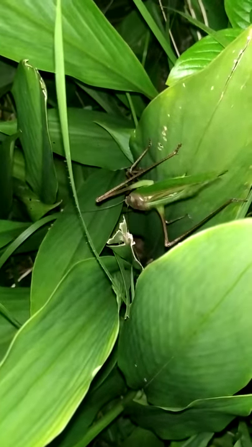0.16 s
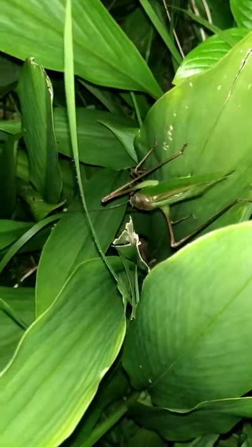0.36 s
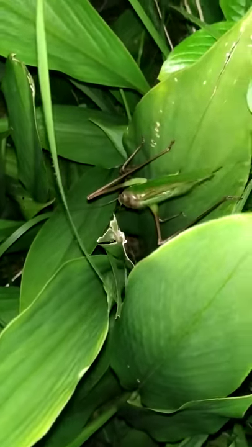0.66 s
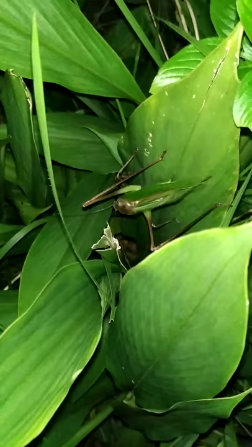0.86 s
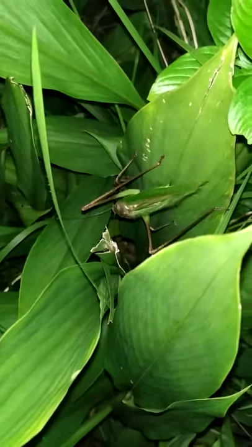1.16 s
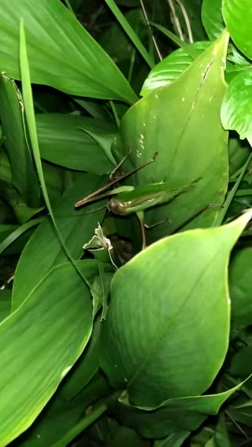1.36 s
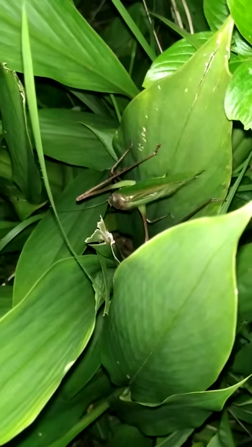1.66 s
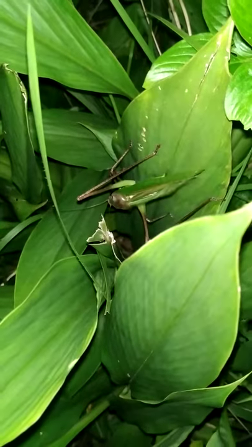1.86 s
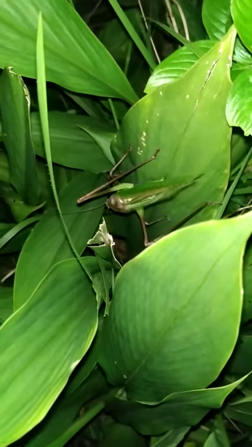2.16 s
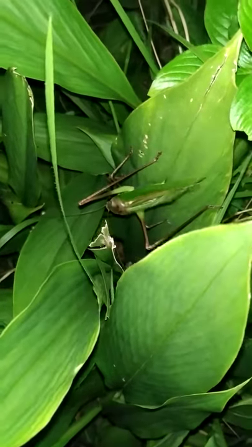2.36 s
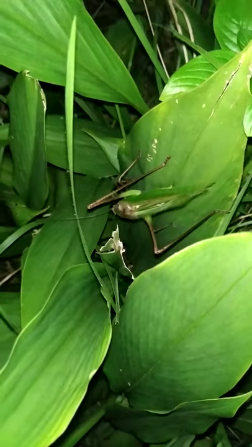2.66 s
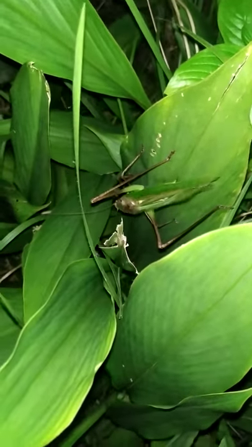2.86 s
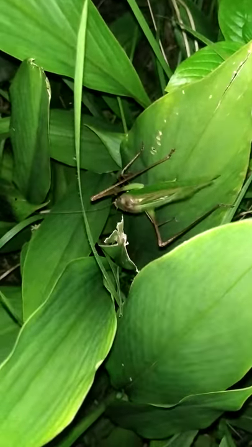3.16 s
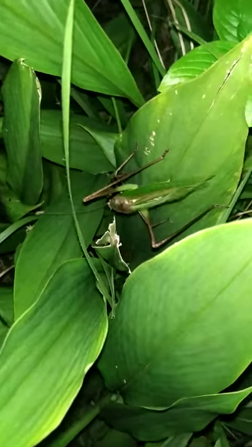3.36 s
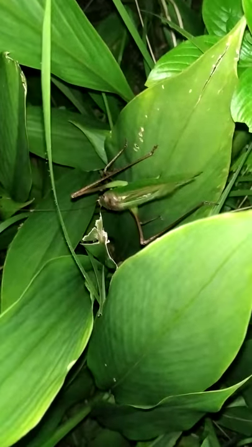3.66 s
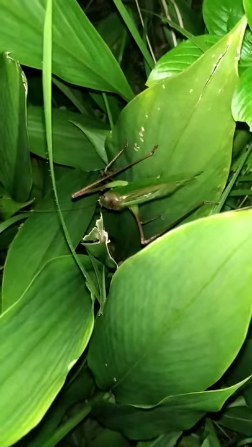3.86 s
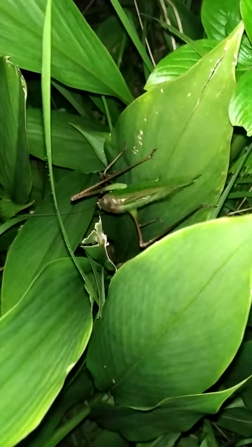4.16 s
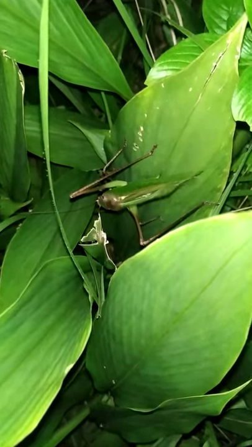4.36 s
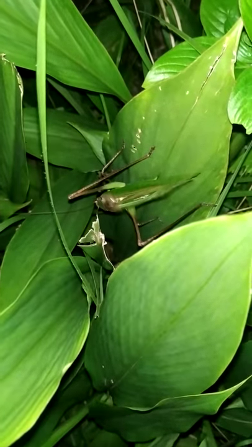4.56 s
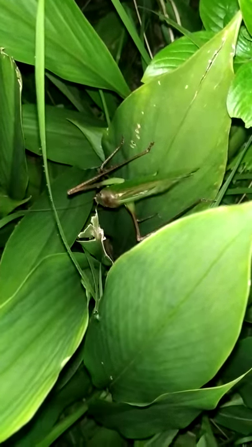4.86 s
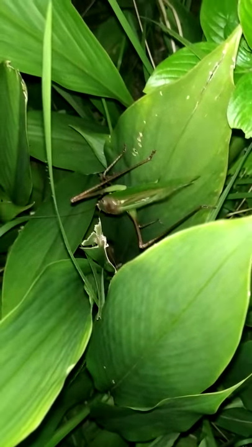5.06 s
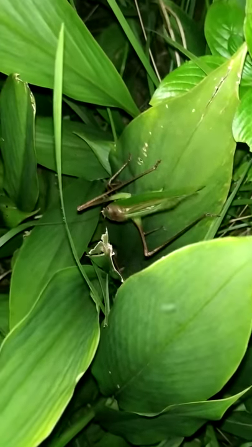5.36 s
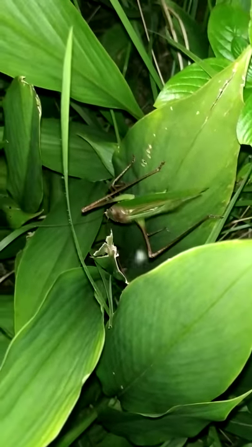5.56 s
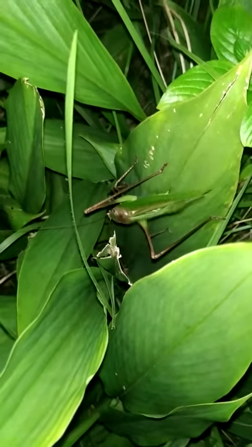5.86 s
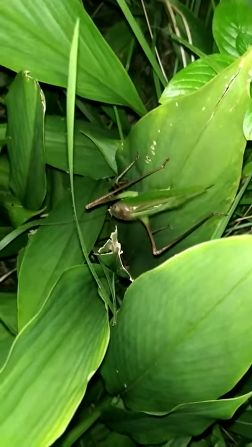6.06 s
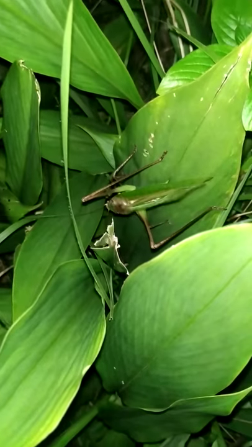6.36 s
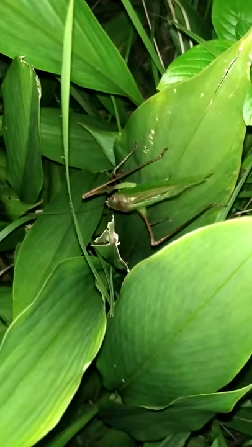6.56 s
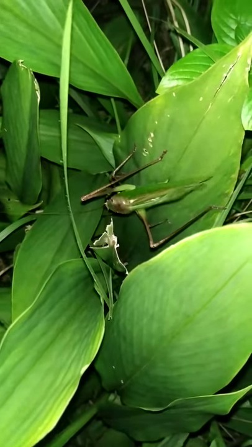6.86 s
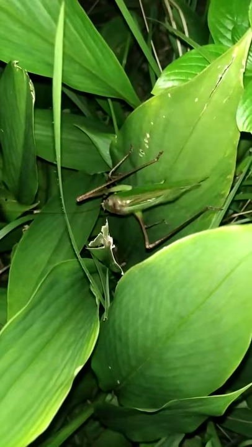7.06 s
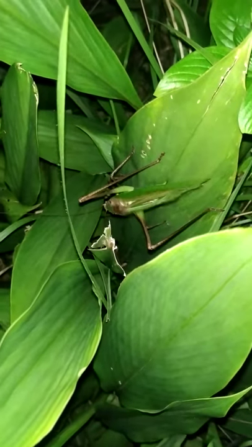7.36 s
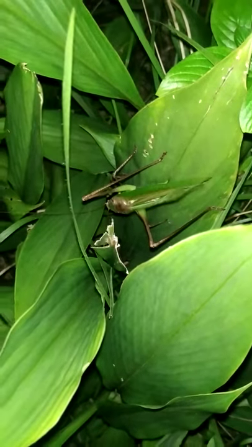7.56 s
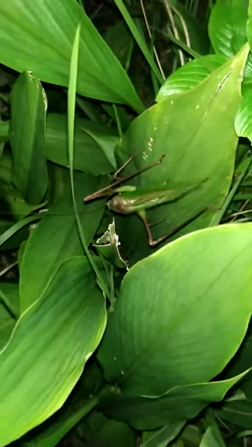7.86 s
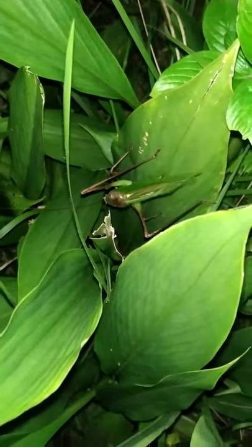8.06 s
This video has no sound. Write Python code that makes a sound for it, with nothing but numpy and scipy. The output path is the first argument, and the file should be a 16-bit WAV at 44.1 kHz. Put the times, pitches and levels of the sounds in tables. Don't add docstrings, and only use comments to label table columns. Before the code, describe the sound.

A single katydid on a leaf sings right next to a handheld phone, outdoors at night. Its trill is already going and never stops: a bright, dry, rasping buzz pulsing about 28 times a second, each pulse a hard scrape and a softer one with tiny gliding whistles. Foliage adds close scattered echoes, a faint shrill insect chorus hisses behind, and irregular overload ticks appear, mostly on the right.

```python
import sys
import numpy as np
from scipy import signal
from scipy.fft import rfft, irfft, next_fast_len
from scipy.io import wavfile
from scipy.ndimage import uniform_filter1d, map_coordinates

SR = 44100
rng = np.random.default_rng(int(sys.argv[2]) if len(sys.argv) > 2 else 0)


def wav_out(sig):
    wavfile.write(sys.argv[1], SR, np.round(np.clip(np.atleast_2d(sig).T, -1, 1) * 32767).astype(np.int16))


def boost(x):
    u = np.asarray(x, float) / 20
    return 10 ** u


N = 361179
TIME = np.arange(N) / SR
SIZE = next_fast_len(N, True)
HZ = np.fft.rfftfreq(SIZE, 1 / SR) + 1


def noise():
    return rng.standard_normal(N)


def rms1(x):
    return x / np.sqrt(np.mean(x ** 2))


def walk(rate_hz):
    hold = max(int(SR / rate_hz), 1)
    levels = np.repeat(rng.standard_normal(N // hold + 1), hold)
    smooth = uniform_filter1d(uniform_filter1d(levels, hold), hold)
    return rms1(smooth[:N])


def lowpass(x, hz):
    return signal.sosfilt(signal.butter(2, hz, fs=SR, output="sos"), x)


def wing_cycle():
    # start_s, lead over an even beat_cycles
    beat_lead = [(0, .093), (.375, .069), (.875, .096), (1.5, -.012), (2, .02), (2.2, .003), (2.5, .027),
                 (3.25, -.002), (4, .069), (4.875, .177), (5.25, .139), (5.7, .055), (5.9, .074),
                 (6.5, .053), (6.875, -.048), (7.125, -.227), (7.75, -.53), (8.19, -.75)]
    start_s, lead = np.transpose(beat_lead)
    cycle_hz = 28
    beats = cycle_hz * TIME + np.interp(TIME, start_s, lead)
    return (beats + 0.00809 * walk(60)) % 1


def rasp(cycle):
    # cycle_share, tooth_rate_hz, level_db
    hard_rasp = [
        (-.12, 2303, -9),
        (-.06, 2250, 2),
        (0, 2309, 3),
        (.07, 2450, 2),
        (.14, 2590, 0),
        (.18, 2620, -13),
    ]
    # cycle_share, tooth_rate_hz, level_db
    soft_rasp = [
        (0.471, 2357, -23.5),
        (0.521, 2329, -4.5),
        (.73, 2376, -3.5),
        (.76, 2408, -19.5),
    ]
    share, hz, db = np.transpose(hard_rasp + soft_rasp)

    unevenness = 1 + 0.01 * walk(60) + 0.035 * walk(1500)
    tooth_rate = np.interp(cycle, share, hz, period=1) * unevenness
    phase = 2 * np.pi * np.cumsum(tooth_rate) / SR
    force = boost(np.interp(cycle, share, db, period=1) + 0.76 * walk(50))

    overtones = np.zeros(N)
    for k in range(2, 7):
        flutter = boost(1.9 * walk(500))
        overtones += flutter * np.cos(k * phase + 1.49 * walk(300))
    lowest_level = force ** 1.03 * boost(1.93 * walk(360) - 1.6)
    lowest = lowest_level * np.cos(phase + 0.72 * walk(300))
    return force * (lowest + overtones) / 2, force


def whistle(cycle):
    # cycle_share, pitch_hz, level_db
    dive = [
        (0, 8983, -22),
        (.21, 9398, -0.5),
        (.255, 6375, -7),
        (.29, 4812, 7.5),
        (.33, 4967, -9.5),
        (.37, 6346, -2.5),
        (.42, 6778, -32.5),
    ]
    # cycle_share, pitch_hz, level_db
    climb = [
        (.75, 5174, -74),
        (.78, 5183, 1.5),
        (.81, 5898, -7),
        (.83, 7488, -1),
        (.86, 7987, -10),
    ]
    share, hz, db = np.transpose(dive + climb)

    pitch_hz = np.interp(cycle, share, hz)
    wobble = 1 + 0.026 * walk(50) + 0.05 * walk(1200)
    phase = 2 * np.pi * np.cumsum(pitch_hz * wobble) / SR
    second = (pitch_hz < 7500) * np.sin(2 * phase)
    third = (pitch_hz < 5100) * np.sin(3 * phase)
    tone = np.sin(phase) + boost(-5) * second + boost(-12) * third
    return boost(np.interp(cycle, share, db) + 1.66 * walk(500)) * tone


def near_leaf(x, lag_s, strength):
    lag = lag_s * SR * (1 + 0.033 * walk(1.107))
    echo = map_coordinates(x, [np.arange(N) - lag], order=3)
    return x + strength * echo


def leaves(x):
    fade = np.exp(-np.log(1000) * TIME[:8192] / 0.04)
    echoes = rng.standard_normal(8192) * fade
    return rms1(signal.fftconvolve(x, echoes)[:N])


def colour(x, resonances, phase_points):
    hz, db = np.transpose(resonances)
    phase_hz, radians = np.transpose(phase_points)
    fall_db = 18 * np.clip(np.log2(HZ / hz[0]), -2, 0)
    gain = boost(np.interp(np.log(HZ), np.log(hz), db) + fall_db)
    turn = np.exp(1j * np.interp(HZ, phase_hz, radians))
    return irfft(rfft(x, SIZE) * gain * turn, SIZE)[:N]


def port(song, force, resonances, phase_points, lag_s, strength):
    scraping = (boost(-21.5) * force + boost(-11)) * noise()
    foliage = boost(-12) * leaves(song)
    heard = near_leaf(song, lag_s, strength) + scraping + foliage
    return colour(heard, resonances, phase_points)


def overload(force, size_db):
    ultrasound = rms1(force * np.abs(lowpass(noise(), 2500)))
    excess = np.maximum(ultrasound - 2, 0)
    return -boost(size_db) * rms1(lowpass(excess, 800))


def offset():
    # start_s, size (1 is full scale)
    large_jumps = [(0.042, -0.014), (0.212, -0.03), (0.3582, -0.04), (0.473, -0.02), (0.963, 0.019),
                   (1.0795, -0.031), (1.2205, -0.02), (1.3939, -0.021), (1.5739, 0.046), (1.716, -0.038),
                   (1.9387, -0.015), (2.8686, -0.042), (3.819, -0.081), (3.8522, 0.072), (3.9647, 0.062),
                   (3.9981, -0.026), (4.1761, -0.028), (4.7445, -0.059), (5.5082, -0.017), (6.39, -0.022),
                   (6.4603, -0.057), (6.7512, 0.12), (6.9701, -0.016), (7.4902, -0.033), (7.5984, -0.025),
                   (7.8769, 0.063)]
    count, small_size, small_spread = 60, -0.014, 0.007
    small_jumps = []
    for k in range(count):
        start_s = (k + rng.random()) * N / SR / count
        small_jumps.append((start_s, small_size + small_spread * rng.standard_normal()))

    out = np.zeros(N)
    for start_s, size in large_jumps + small_jumps:
        start = int(start_s * SR)
        after_s = TIME[:min(SR // 2, N - start)]
        out[start:start + len(after_s)] += size * np.exp(-after_s * (12 + 350 * abs(size)))
    return lowpass(out, 1600)


def katydid():
    cycle = wing_cycle()
    teeth, force = rasp(cycle)
    scraping = boost(-1) * force * noise()
    chorus = boost(-9.5) * noise()
    shrill = noise()
    highest_singers = boost(-12.5) * (shrill - lowpass(shrill, 7800))
    return teeth + whistle(cycle) + scraping + chorus + highest_singers, force


def scene():
    # pitch_hz, level_db
    left_resonances = [(2000, -22), (2300, -2.5), (2600, -4), (3100, -8), (4000, -19.5), (4630, 1.5),
                       (5250, -17), (5700, -4.5), (6750, 6), (7600, -5), (8000, -5), (8900, -11.5),
                       (11700, -3), (12900, -6), (13950, 2), (15200, -9.5)]
    # pitch_hz, level_db
    right_resonances = [(2000, -16), (2300, -4.5), (2600, -7), (3000, -14.5), (4000, -11), (5100, 10.5),
                        (5950, 5), (6350, 4.5), (7500, -2.5), (8000, -7.5), (8900, -6.5), (10000, -9),
                        (11750, -1.5), (12900, -9), (13900, -7), (15200, 1)]
    # pitch_hz, lead_radians
    port_phase = [(0, 0), (2400, -1.4), (3620, -3.3), (4050, -5.8), (5340, -7.8), (6120, -12.8),
                  (6370, -17.2), (7580, -22.2), (8200, -22), (8600, -20.6), (12200, -20.8), (12700, -25.1),
                  (13700, -21.6), (15200, -26.5)]
    # start_s, turn (-1 to 1)
    hand_turn = [
        (0, 0.33),
        (1.0, 0.048),
        (1.6, -0.32),
        (3.3, 1),
        (4.0, 0.48),
        (4.9, 0.96),
        (5.25, 0.16),
        (6.4, 0.69),
        (8.19, 0.89),
    ]
    turn = np.interp(TIME, *np.transpose(hand_turn))
    level_db = -13 - 1.13 * turn - 0.21 * walk(3.02)
    treble_db, pan_db = 3 * turn, 0.16 * turn
    treble_db = treble_db - np.mean(treble_db)
    pan_db = pan_db - np.mean(pan_db)

    song, force = katydid()
    left = port(song, force, left_resonances, port_phase, 0.0011, -0.34)
    right = port(song, force, right_resonances, [(0, 0.11)], 0.000769, 0.3)
    ports = []
    for heard, side, spike_db, hiss_db in ((left, 1, -63, -55), (right, -1, -50, -44)):
        low = irfft(rfft(heard, SIZE) * (HZ < 9800), SIZE)[:N]
        heard = low + boost(treble_db) * (heard - low)
        heard = heard * boost(level_db + side * pan_db / 2)
        hiss = boost(hiss_db) * lowpass(noise(), 2500)
        low_rumble = boost(-35 - 4.4 * side) * lowpass(noise(), 90)
        ports.append(heard + overload(force, spike_db) + hiss + low_rumble)
    return np.array([ports[0], ports[1] + offset()])


def low_pass(x):
    return signal.sosfilt(signal.butter(12, 16480, fs=SR, output="sos"), x)


def record(dry):
    rounded = np.tanh(1.35 * dry) / 1.35
    top_cut = signal.ellip(12, 0.3, 80, 15620, fs=SR, output="sos")
    return low_pass(signal.sosfilt(top_cut, rounded))


dry = scene()
out = record(dry)
wav_out(out)
```